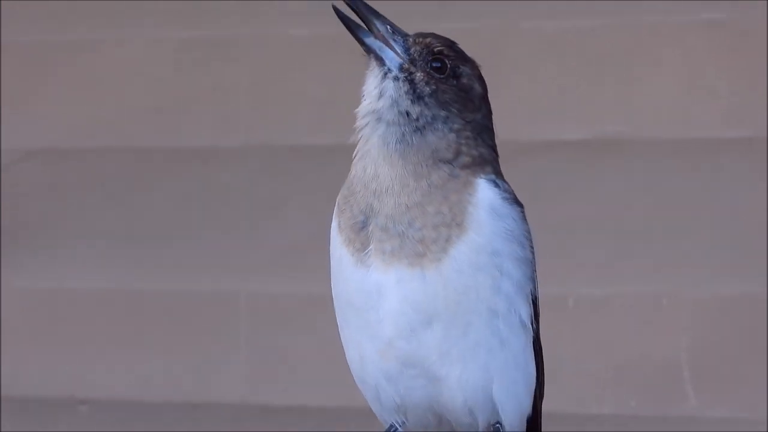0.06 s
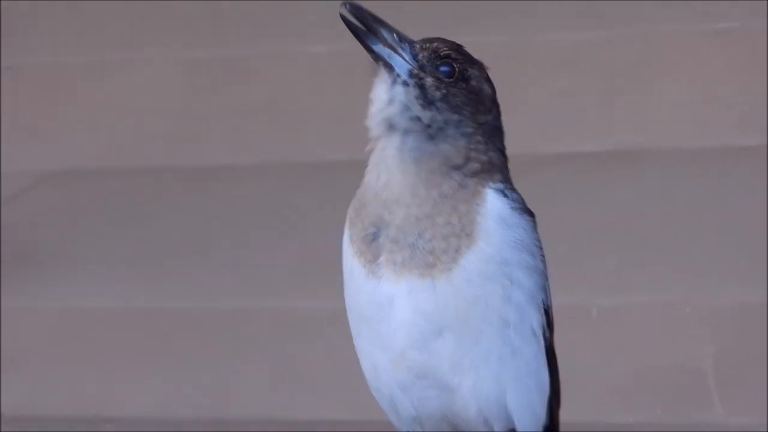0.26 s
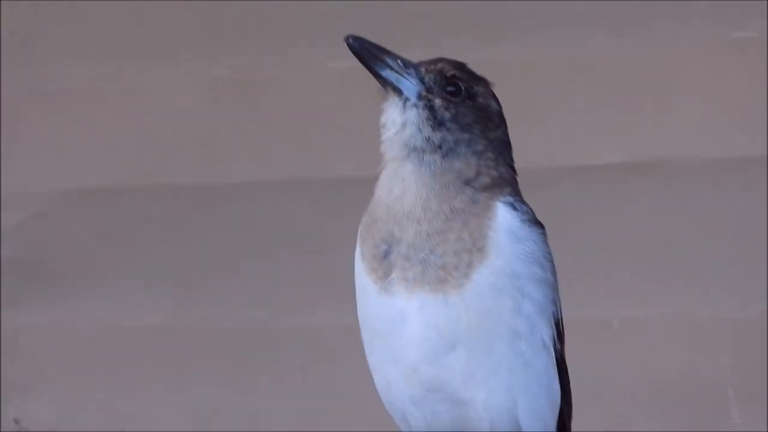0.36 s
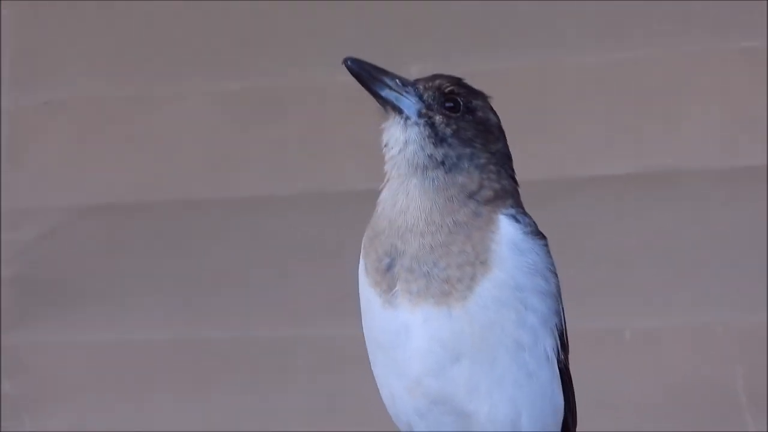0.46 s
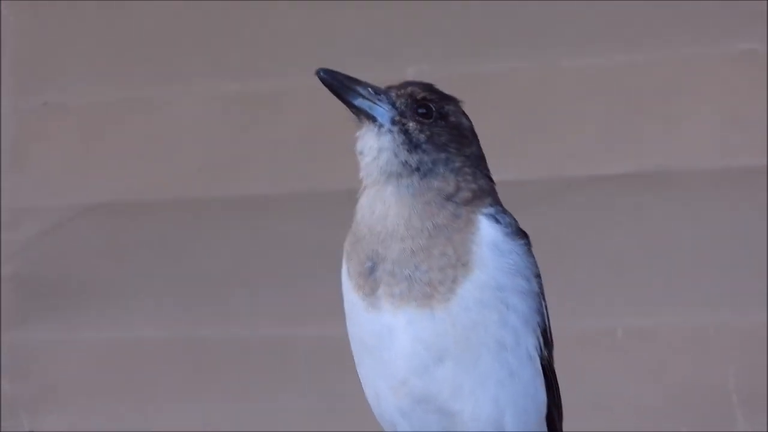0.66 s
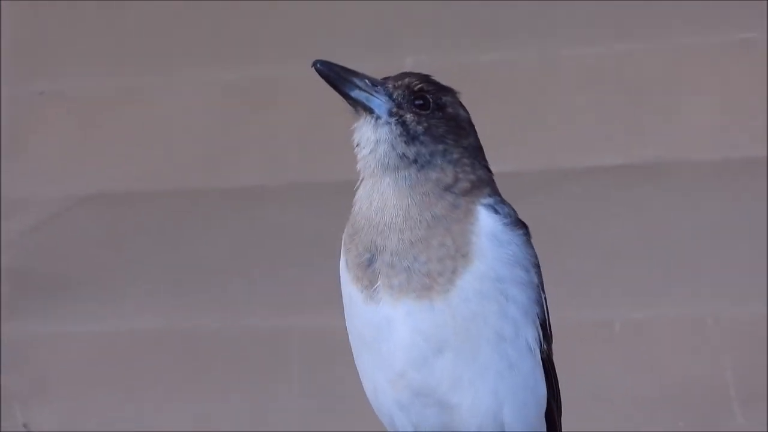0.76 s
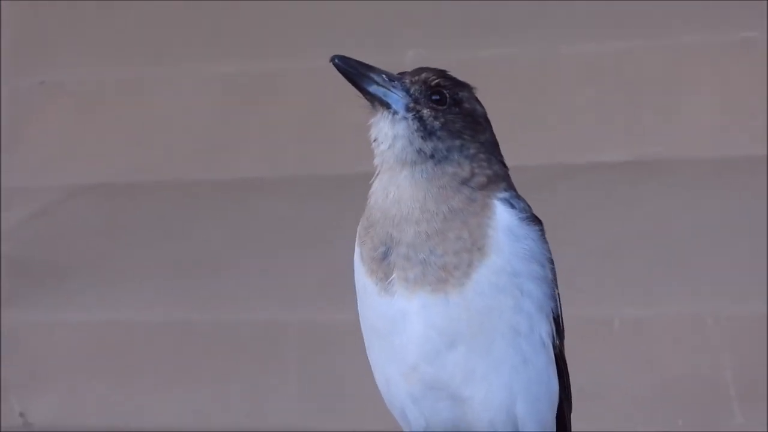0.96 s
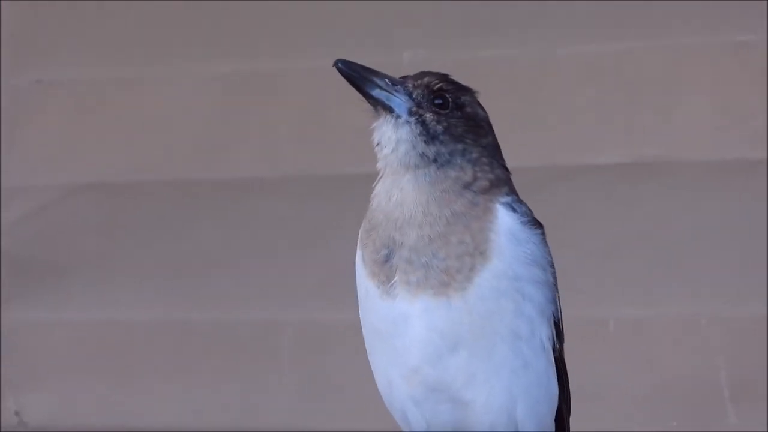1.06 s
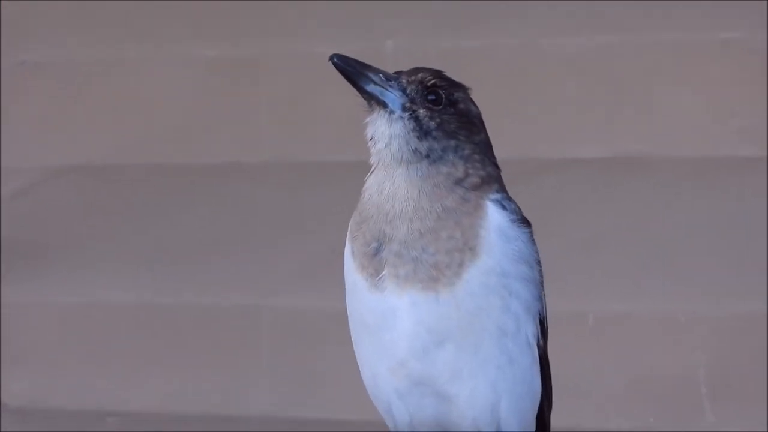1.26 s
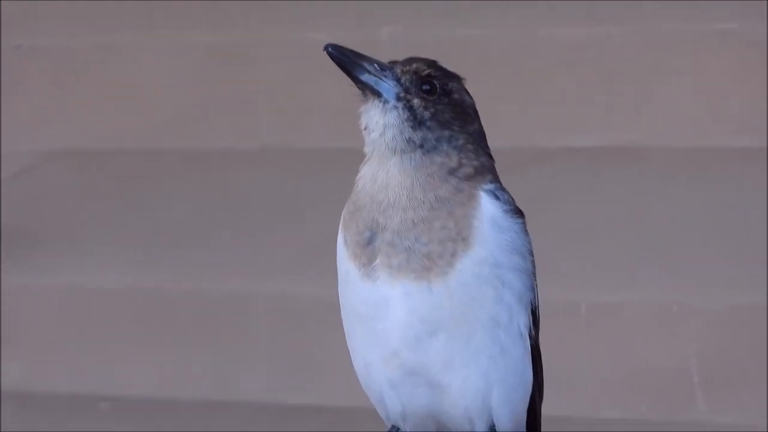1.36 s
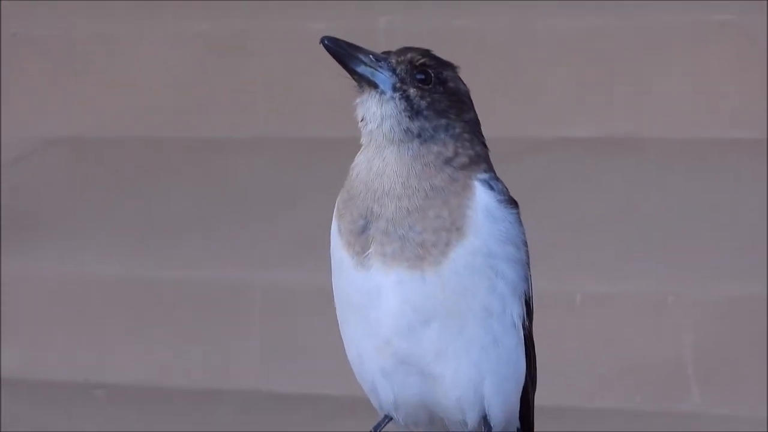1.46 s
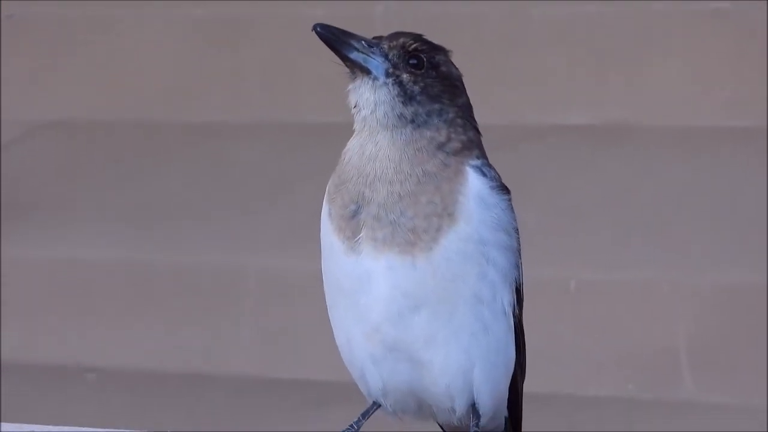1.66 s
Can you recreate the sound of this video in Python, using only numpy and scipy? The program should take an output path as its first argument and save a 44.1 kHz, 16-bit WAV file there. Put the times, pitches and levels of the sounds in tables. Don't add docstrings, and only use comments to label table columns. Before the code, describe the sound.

Low pure bird whistle in two quick pulses, followed by faint wavering twitters and a distant caw.

```python
import sys
import numpy as np
from scipy import signal
from scipy.fft import rfft, irfft
from scipy.io import wavfile
from scipy.ndimage import uniform_filter1d

SR = 44100
rng = np.random.default_rng(int(sys.argv[2]) if len(sys.argv) > 2 else 0)


def volts_from_db(level):
    exponent = np.asarray(level, float) / 20
    return 10 ** exponent


def materialize(psi):
    bounded = np.clip(np.atleast_2d(psi).T, -1, 1)
    quanta = np.round(bounded * 32767).astype(np.int16)
    wavfile.write(sys.argv[1], SR, quanta)


N = 74970
T_S = np.arange(N) / SR
FFT_HZ = np.fft.rfftfreq(N, 1 / SR)


def col(table, x, k, log=False):
    a = np.array(table, float)
    if log:
        return np.interp(np.log(x + 1e-9), np.log(a[:, 0]), a[:, k])
    return np.interp(x, a[:, 0], a[:, k])


def unit(x):
    return x / np.sqrt(np.mean(x ** 2))


def gauss(x, centre, width):
    return np.exp(-.5 * ((x - centre) / width) ** 2)


def bell(x, centre_hz, width_hz):
    return irfft(rfft(x) * gauss(FFT_HZ, centre_hz, width_hz), N)


def walk(rate_hz):
    return unit(bell(rng.standard_normal(N), 0, rate_hz))


def place(x, pan_db, lag_samples):
    late = irfft(rfft(x) * np.exp(-2j * np.pi * np.fft.rfftfreq(N) * lag_samples), N)
    return np.array([x * volts_from_db(pan_db / 2), late * volts_from_db(-pan_db / 2)])


def echo(x, t60_s):
    t = np.arange(int(.6 * SR)) / SR
    first_s = .008
    tail = rng.standard_normal((2, len(t))) * np.exp(-np.log(1000) * t / t60_s) * (t > first_s)
    tail = tail / np.sqrt(np.sum(tail ** 2) / 2)
    return signal.fftconvolve(x[None], tail, axes=1)[:, :N]


# freq_hz, density_db_per_hz
TOWN = [(45, -43.5), (70, -23), (520, -4), (1000, -4), (2400, -13.5), (5500, -16.5), (10000, -32),
        (13500, -52)]
# time_s, level_db
TRAFFIC = [(0, -41.5), (.3, -39.5), (.65, -37.5), (.88, -35), (1.1, -36), (1.45, -35), (1.7, -37.5)]
# freq_hz, likeness_0_to_1
LIKE = [(60, .75), (500, .88), (2000, .8), (4000, .6), (8000, .4), (13000, .3)]


def town():
    swell_db, flicker_db, traffic_octaves = .5, 2.1, 1.5
    base_db = TRAFFIC[-1][1]
    swell = swell_db * walk(3.8)
    out = 0
    for hz in 50 * 2 ** np.arange(0, 8.3, 1 / 3):
        like = np.clip(col(LIKE, hz, 1, True), 0, 1)
        mid, side = bell(rng.standard_normal((2, N)), hz, hz / 8)
        lift_db = (col(TRAFFIC, T_S, 1) - base_db) * gauss(np.log2(hz / 800), 0, traffic_octaves)
        level_db = col(TOWN, hz, 1, True) + lift_db + swell + flicker_db * walk(8.1)
        stereo = np.sqrt(1 + like) * mid + np.sqrt(1 - like) * side * np.array([[1], [-1]])
        out = out + volts_from_db(level_db) * stereo
    air = rng.standard_normal((3, N))
    fan_hz, fan_width_hz, fan_db = 178, 22, -55.5
    fan = unit(bell(air[0] + .4 * air[1:], fan_hz, fan_width_hz / 2))
    return unit(out) * volts_from_db(base_db - 2.5) + fan * volts_from_db(fan_db + 1.5 * walk(3))


# start_s, peak_s, end_s, level_db, centre_hz
RUSTLES = [(0.431, .455, .52, -37.5, 3900), (.48, 0.517, .6, -35.5, 3900), (0.68, 0.684, 1, -43, 5020),
           (0.068, 0.17, 0.53, -49.5, 5400), (0.27, .39, .44, -50, 4200), (.4, .8, 2.6, -58, 8500)]


def rustle():
    out = 0
    for start_s, peak_s, end_s, level_db, centre_hz in RUSTLES:
        rise = (T_S - start_s) / (peak_s - start_s)
        fall = (end_s - T_S) / (end_s - peak_s)
        shape = np.clip(np.minimum(rise, fall), 0, 1)
        grain = rng.standard_normal((3, N)) * volts_from_db(3.1 * walk(290))
        hiss = unit(bell(grain[0] + .9 * grain[1:], centre_hz, .4 * centre_hz))
        out = out + volts_from_db(level_db) * shape * hiss
    return out


# start_s, level_db, pitch_hz, t60_s, click_db
KNOCKS = [
    (1.51, -29, 270, .07, -36),
    (1.508, -28, 1260, .05, -55),
    (1.629, -38, 640, .08, -30),
    (.975, -45, 100, .1, -65),
]


def knocks():
    out = 0
    for start_s, level_db, pitch_hz, t60_s, click_db in KNOCKS:
        t = np.maximum(T_S - start_s, 0)
        decay = np.exp(-np.log(1000) * t / t60_s) * (1 - np.exp(-t / 0.0052))
        ring = volts_from_db(level_db) * np.sin(2 * np.pi * pitch_hz * t) * decay
        click = (t > 0) * np.exp(-t / .0007) * unit(bell(rng.standard_normal(N), 7000, 5000))
        out = out + ring + volts_from_db(click_db) * click
    return place(out, 3.1, 0.22)


# time_s, pitch_hz, level_db
CAW = [(1.151, 221, -48), (1.19, 232, -41), (1.214, 248, -35), (1.24, 260, -34), (1.305, 264, -29.5),
       (1.325, 265, -28), (1.35, 256, -29), (1.368, 250, -32), (1.388, 248, -46),
       (1.42, 247.5, -50), (1.498, 257, -50), (1.621, 254.4, -46), (1.664, 263, -37.5),
            (1.7, 267, -41.5)]
# centre_hz, width_hz, level_db
CROW_THROAT = [(1470, 170, 0), (1980, 200, -1.5), (4420, 200, -14), (5450, 380, -16), (750, 200, -16)]
# time_s, first_hz, second_hz, lift_4400_hz_db, lift_5500_hz_db
GAPE = [(1.19, 1420, 1750, -12, -12), (1.25, 1520, 1920, -2, -2), (1.3, 1400, 1920, 7, 0),
        (1.32, 1380, 2080, 2, -1), (1.34, 1540, 2060, -3, -2), (1.38, 1520, 2050, -8, 2),
        (1.66, 1330, 1850, -12, -12)]


def throat(freq_hz, resonances):
    return sum(volts_from_db(db) * gauss(freq_hz, centre, width) for centre, width, db in resonances)


def crow():
    jitter, breath_gain, waver_db = .005, .35, 3.2
    call = CAW
    pitch_hz = uniform_filter1d(col(call, T_S, 1), size=600) * (1 + jitter * walk(49))
    phase = 2 * np.pi * np.cumsum(pitch_hz) / SR
    first, second, third, fourth, low = CROW_THROAT
    moving = [(col(GAPE, T_S, 1), *first[1:]),
              (col(GAPE, T_S, 2), *second[1:]),
              (*third[:2], third[2] + col(GAPE, T_S, 3)),
              (*fourth[:2], fourth[2] + col(GAPE, T_S, 4)),
              low]
    voice = 0
    for k in range(2, 25):
        level = throat(k * pitch_hz, moving) * volts_from_db(waver_db * walk(2.5 * k))
        voice = voice + level * np.sin(k * phase + k * k / 2.5 + .04 * k * walk(40))
    puff = np.exp(1.8 * np.cos(phase)) * rng.standard_normal(N)
    breath = irfft(rfft(puff) * throat(FFT_HZ, CROW_THROAT), N)
    rasp = 0.13 * volts_from_db(col(GAPE, T_S, 4)) * unit(bell(puff, 4800, 750))
    out = unit(voice) + breath_gain * unit(breath) + rasp
    throb_hz, throb_peak_s, throb_span_s, throb_db = 64, 1.35, .025, 3
    throb = throb_db * gauss(T_S, throb_peak_s, throb_span_s)
    throb = throb * np.cos(2 * np.pi * throb_hz * (T_S - throb_peak_s))
    onset = np.clip((T_S - call[0][0]) / 0.016, 0, 1)
    out = out * onset * volts_from_db(col(call, T_S, 2) + throb)
    echo_db, pan_db = -8, 5
    return place(out, pan_db, 0.99) + volts_from_db(echo_db) * echo(bell(out, 0, 3000), 0.92)


def sing(note, partials, rough, edge_s=0.005):
    edge = np.minimum(T_S - note[0][0] + edge_s, note[-1][0] - T_S + edge_s)
    gate = np.clip(edge / edge_s, 0, 1)
    level = volts_from_db(uniform_filter1d(col(note, T_S, 2), size=120) + 5 * rough * walk(110))
    pitch_hz = uniform_filter1d(col(note, T_S, 1), size=200) * (1 + .012 * rough * walk(100))
    phase = 2 * np.pi * np.cumsum(pitch_hz) / SR
    return np.sqrt(2) * gate * level * sum(volts_from_db(db) * np.sin(k * phase) for k, db in partials)


# time_s, pitch_hz, level_db
FIRST = [(0, 3130, -43), (.02, 3170, -46), (.06, 3200, -56)]
UPSWEEP = [(.422, 3500, -48), (.428, 3720, -34), (.434, 4050, -35), (.441, 4250, -36), (.456, 4220, -30),
           (.472, 4190, -32), (.483, 4110, -42), (.5, 4270, -49), (.508, 4300, -55)]
WAVER = [(.475, 3130, -52), (.485, 3160, -44), (.5, 3230, -44), (.52, 3310, -35), (.535, 3200, -37),
         (.548, 3000, -43), (.575, 2920, -38), (.602, 3140, -34), (.625, 3220, -48)]
LOW = [(.52, 2560, -46), (.533, 2530, -32), (.55, 2470, -39), (.575, 2490, -31), (.595, 2560, -33),
       (.605, 2600, -46)]
FLAT = [(0.575, 3740, -86), (0.591, 3793, -34), (0.637, 3724, -42.5), (0.66, 3780, -66)]
LONG = [(0.61, 2750, -65), (0.626, 2823, -36.5), (0.67, 2863, -25.5), (0.688, 2865, -37), (0.72, 2852, -31),
        (0.78, 2536, -40.5), (0.795, 2507, -52)]
FAINT = [(.33, 2720, -54), (.358, 2760, -47), (.37, 2840, -42), (.39, 2870, -45), (.402, 3000, -52)]
RISE = [(0.725, 4180, -51), (0.755, 4490, -46), (0.775, 4130, -73)]
PERCH = [(.412, 3470, -50), (.422, 3510, -39), (.434, 3540, -41), (.442, 3540, -52)]
THIN = [(.345, 4100, -58), (.365, 4180, -52), (.39, 4330, -49), (.41, 4350, -58)]
EARLY = [(.15, 3250, -60), (.18, 3330, -52), (.21, 3310, -52), (.235, 3300, -60)]
SAG = [(.44, 2520, -52), (.46, 2500, -44), (.475, 2400, -48), (.483, 2300, -43), (.5, 2320, -54)]
# note, octave_db, pan_db, lag_samples, roughness
TWITTER = [(FIRST, -5, 1, .2, .15), (UPSWEEP, -30, 2, .2, .6), (WAVER, -8, 3, .3, .8),
           (LOW, -20, 3, .2, .5), (FLAT, -25, 2, .2, .35), (LONG, -24, 4, .2, .25), (FAINT, -12, 3, .2, .7),
           (RISE, -25, 1, .2, .3),
           (PERCH, -30, 2, .2, .3), (THIN, -30, 2, .2, .4), (EARLY, -30, 2, .2, .4), (SAG, -30, 3, .2, .5)]


def twitter():
    direct, dry_sum = 0, 0
    for note, octave_db, pan_db, lag_samples, rough in TWITTER:
        tone = sing(note, [(1, 0), (2, octave_db)], rough)
        direct = direct + place(tone, pan_db, lag_samples)
        dry_sum = dry_sum + tone
    echo_db, t60_s = -5.5, .15
    return direct + volts_from_db(echo_db) * echo(dry_sum, t60_s)


# time_s, pitch_hz, level_db, pan_db
LEAD_IN = [(.125, 1335, -48, 3), (.146, 1340, -45, 3), (.158, 1333, -32.5, 3), (.172, 1351, -37.5, 3),
           (.188, 1346, -26.5, 1.8), (.203, 1358, -22, 2.02), (.214, 1353, -23.5, 2.2)]
WHISTLE_A = [(.226, 1350, -11, 0), (.245, 1350, -8, .5), (.258, 1349, -6, 1), (.278, 1346, -19.5, 3),
             (.29, 1352, -9, 5), (.3, 1352, -6, 5.5), (.309, 1350, -9, 5.5)]
WARBLE = [(.316, 1350, -18, 6), (.3195, 1330, -11, 6), (.324, 1350, -26, 5.5), (.331, 1320, -13.5, 5),
          (.338, 1330, -19.5, 4)]
WHISTLE_B = [(.345, 1312, -12.5, 3), (.36, 1288, -8, 2), (.372, 1285, -10.5, 2), (.39, 1320, -12, 2),
             (.396, 1300, -21, 2), (.401, 1305, -13.5, 2), (.406, 1320, -16, 2), (.4115, 1340, -28, 2),
             (.417, 1350, -20, 2)]
FADE = [(.426, 1330, -38, 1), (.433, 1305, -27, 1), (.439, 1305, -28, 1), (.444, 1310, -36, 1),
        (.449, 1320, -29, 1), (.456, 1310, -30, 1), (.466, 1310, -50, 1), (.521, 1307, -48, 1)]
# time_s, pitch_hz, level_db, pan_db
UNDER = [(.303, 1200, -44, 8), (.316, 1195, -28, 6.5), (.334, 1212, -29, 3), (.35, 1235, -40, 2)]
# multiple, level_db
OVERTONES = [(1, 0), (2, -42), (3, -47), (4, -47), (5, -52), (6, -50), (7, -59), (8, -52), (9, -63),
             (10, -70), (11, -65)]
# time_s, overtone_lift_db, octave_lift_db
BEAK = [(.2, -5, -8), (.23, 2, -16), (.255, 1, -14), (.275, 6, 20), (.292, -10, -6), (.33, -6, 8),
        (.37, -2, -6), (.41, -6, 19), (.43, -8, 16)]


def songbird():
    partials = []
    for k, db in OVERTONES:
        lift_db = 0 if k == 1 else col(BEAK, T_S, 2 if k == 2 else 1)
        partials.append((k, db + lift_db))
    direct, dry_sum = 0, 0
    for note in (LEAD_IN + WHISTLE_A + WARBLE + WHISTLE_B + FADE, UNDER):
        tone = sing(note, partials, .02, edge_s=.004)
        direct = direct + place(tone, col(note, T_S, 3), lag_samples=1.0)
        dry_sum = dry_sum + tone
    echo_db, yard_t60_s = -30, 0.5
    return direct + volts_from_db(echo_db) * echo(dry_sum, yard_t60_s)


def scene():
    return town() + rustle() + knocks() + crow() + twitter() + songbird()


def low_pass(x):
    return signal.sosfilt(signal.butter(12, 15220, fs=SR, output="sos"), x)


# freq_hz, left_lead_rad
PORTS = [(100, -0.5), (3000, 0.26), (4200, 1.43), (6100, 4.5), (8000, 4), (12000, 3.5)]


def record(dry):
    low_cut_hz = 110
    dry = signal.sosfilt(signal.butter(2, low_cut_hz, "high", fs=SR, output="sos"), dry)
    turn = np.exp(-1j * col(PORTS, FFT_HZ, 1, True))
    right = irfft(rfft(dry[1]) * turn, N)
    return low_pass(np.array([dry[0], right]))


dry = scene()
out = record(dry)
materialize(out)
```